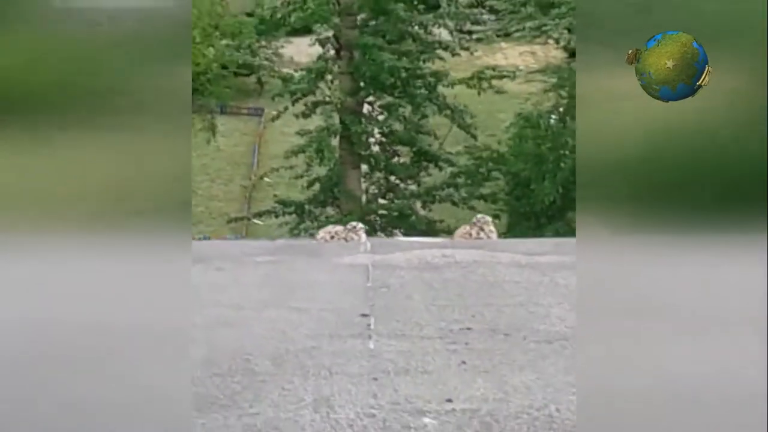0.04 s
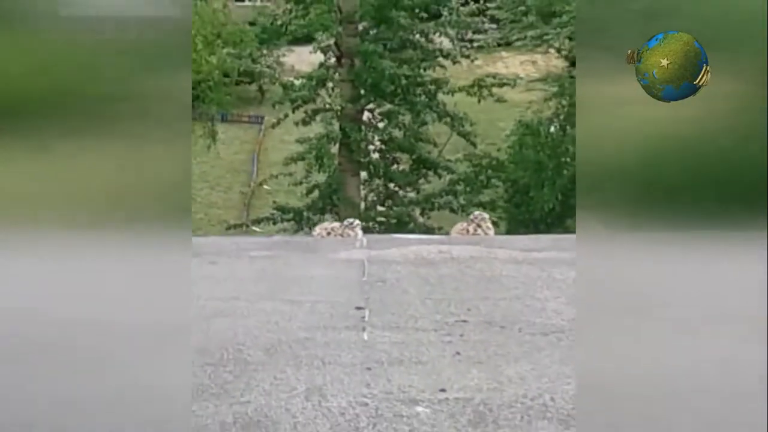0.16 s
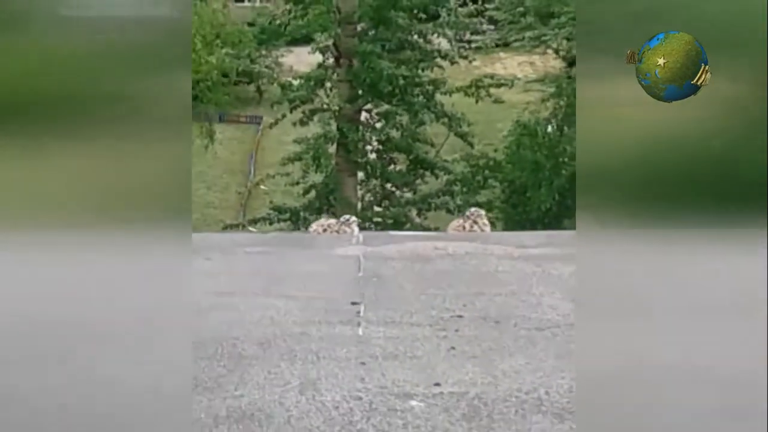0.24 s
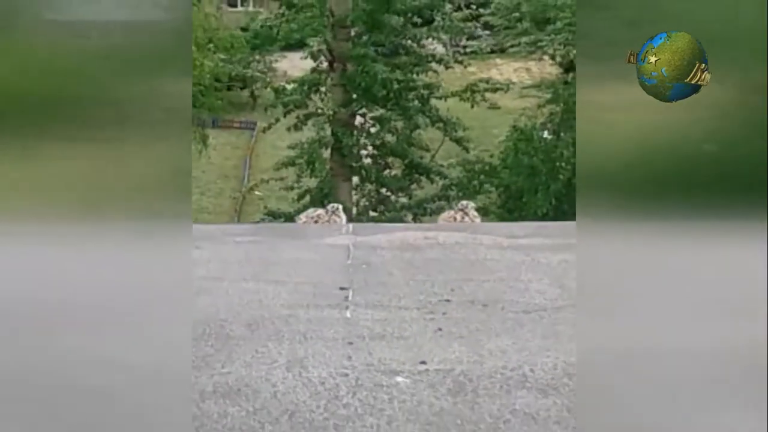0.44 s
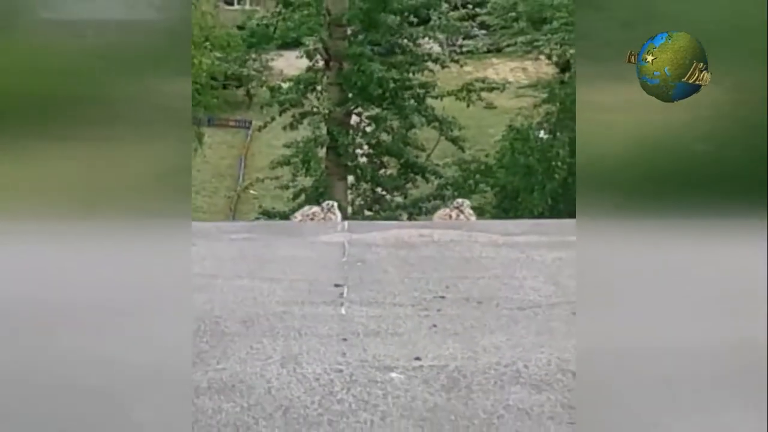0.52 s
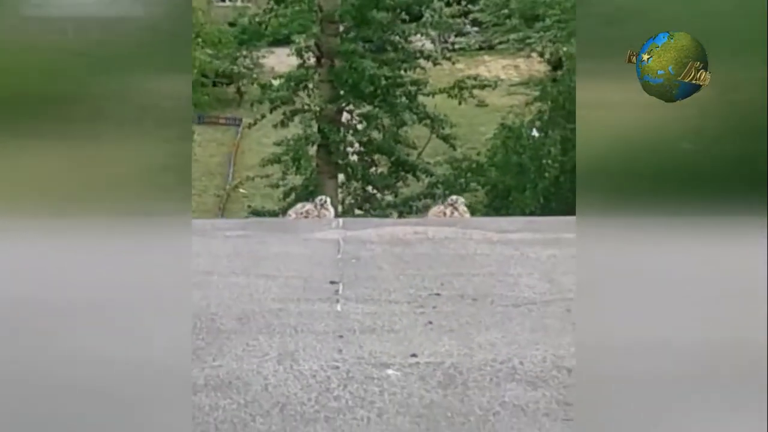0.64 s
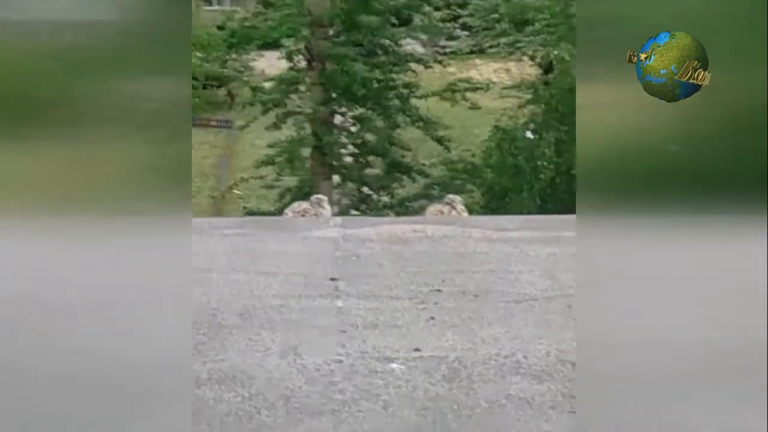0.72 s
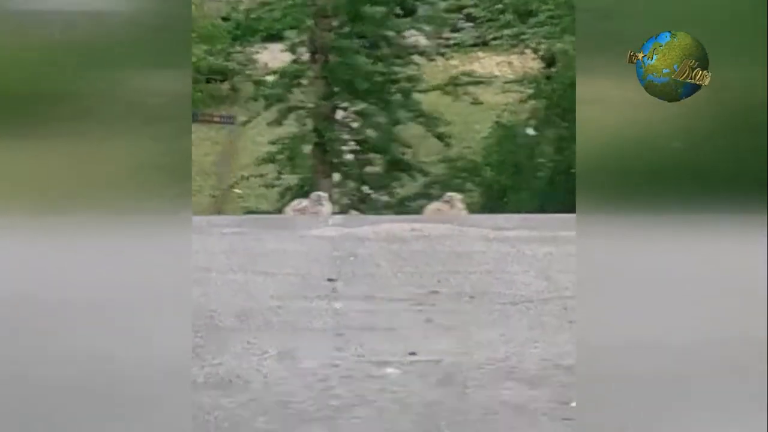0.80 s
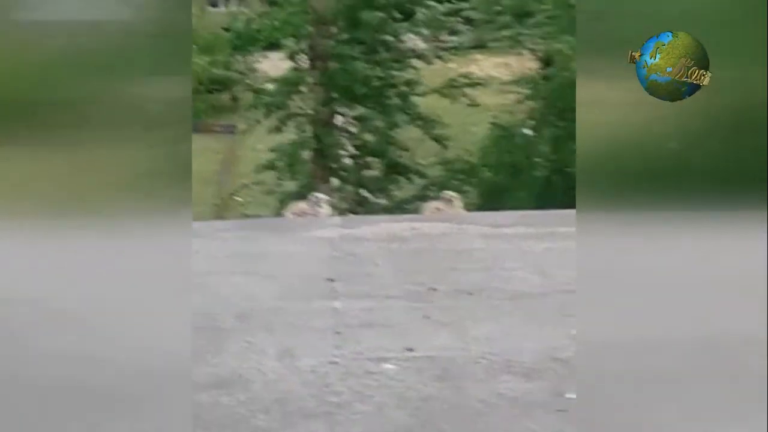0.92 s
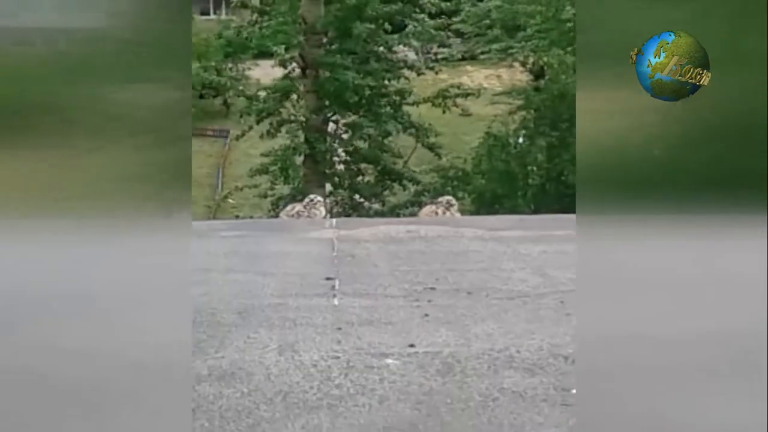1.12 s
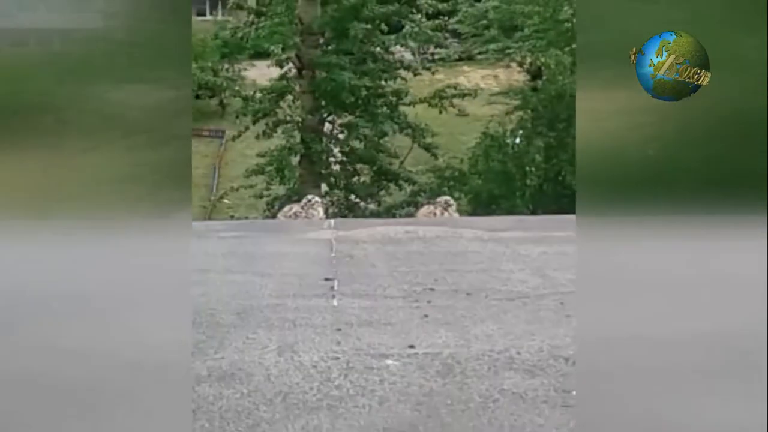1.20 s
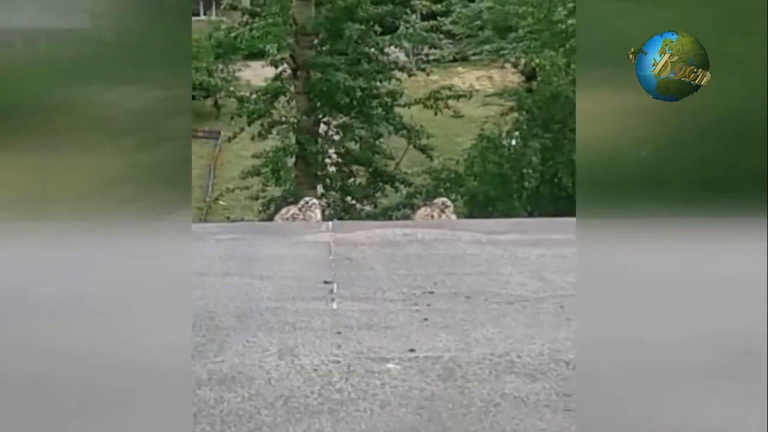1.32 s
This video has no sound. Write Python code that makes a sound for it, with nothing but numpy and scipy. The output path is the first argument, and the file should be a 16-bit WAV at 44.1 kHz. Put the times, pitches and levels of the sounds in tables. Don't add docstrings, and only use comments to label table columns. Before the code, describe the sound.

Two gulls cry on an outdoor rooftop. After low town rumble and a faint claw tick, the first croaks at 0.22 seconds, leaps to a shrill whistle and falls by 0.57. The second overlaps from 0.32, whistles from 0.41 to 0.57, then sags roughly until 0.75. Light echoes and faint distant gulls follow; claws tick from 0.95 and scuff near 1.12, under thin hiss until 1.35.

```python
import sys
import numpy as np
from scipy import signal
from scipy.io import wavfile

SR = 44100
rng = np.random.default_rng(int(sys.argv[2]) if len(sys.argv) > 2 else 0)


def unload_audio(sound):
    columns = np.transpose(np.atleast_2d(sound))
    steps = np.round(np.clip(columns, -1, 1) * 32767)
    wavfile.write(sys.argv[1], SR, steps.astype(np.int16))


def invert_db(x):
    u = np.asarray(x, float) / 20
    return 10 ** u


N = 59535

# (frequency [Hz], level [dB])
CROAK_THROAT = [(600, -20), (1300, -9), (1900, 0), (2700, -8), (3800, -6), (5500, -17), (10000, -34)]
CROAK_ROUGH, CHEST_ROUGH, WHISTLE_ROUGH = 0.55, 0.05, 0.14


def rms_one(x):
    return x / np.sqrt(np.mean(x ** 2) + 1e-20)


def in_time(rows):
    times, *columns = np.transpose(rows)
    return [np.interp(np.arange(N) / SR, times, column) for column in columns]


def at_hz(points, hz):
    table_hz, table_db = np.array(points).T
    return np.interp(np.log(hz), np.log(table_hz), table_db)


def drift(rate_hz, count):
    r = np.exp(-2 * np.pi * rate_hz / SR)
    settle = 4000
    noise = rng.standard_normal((count, N + settle))
    return rms_one(signal.lfilter([1], [1, -2 * r, r * r], noise)[:, settle:])


def gate(start, end, edge):
    t = np.arange(N) / SR
    return np.clip(np.minimum(t - start, end - t) / edge + 0.5, 0, 1)


def ring(x, hz, t60):
    r, w = invert_db(-60 / (t60 * SR)), 2 * np.pi * hz / SR
    return signal.lfilter([0, np.sin(w)], [1, -2 * r * np.cos(w), r * r], x + 1e-18)


def voice(rows, throat, rough, top_db, orders):
    pitch, *levels_db = in_time(rows)
    jitter = 1 + 0.0025 * drift(120, count=1)[0]
    phase = 2 * np.pi * np.cumsum(pitch * jitter) / SR

    effort_db = np.array([db - at_hz(throat, order * pitch) for order, db in zip(orders, levels_db)])
    k = np.arange(1, 17)
    share = np.array([np.interp(k, orders, one) for one in np.eye(len(orders))])
    if orders[-1] < 6:
        share[:, k > orders[-1]] = 1 / len(orders)

    unlisted = ~np.isin(k, orders)[:, None]
    waver_db = 4 * drift(30, count=16) * unlisted
    k = k[:, None]
    tilt_db = top_db * np.log2(np.maximum(k / orders[-1], 1))
    level_db = at_hz(throat, k * pitch) + share.T @ effort_db + waver_db + tilt_db

    grain = 1 + 0.35 * np.log2(k * pitch / 3900).clip(0) * drift(250, count=16)
    audible = k * pitch < 15800
    waves = np.sin(k * phase + rng.uniform(0, 2 * np.pi, k.shape))
    tone = np.sum(invert_db(level_db) * grain * audible * waves, axis=0)
    breath = 1 + rough * drift(600, count=1)[0]
    return np.sqrt(2) * gate(rows[0][0], rows[-1][0], 0.004) * breath * tone


def first_gull():
    # (time [s], pitch [Hz], level of each listed partial [dB], ..)
    croak = [(.217, 650, -49), (.224, 680, -39), (.231, 820, -42), (.239, 900, -38)]
    rise = [(0.239, 1297, -20, -26, -53), (0.249, 1364, -33, -20, -35.5), (0.261, 1477, -23, -35.5, -44.5),
            (0.268, 1483, -31, -23, -31)]
    whistle = [(0.267, 3325, -23.5, -38), (0.289, 3627, -18, -27.5), (0.307, 3658, -16, -41.5),
               (0.343, 3691, -17.5, -29), (0.361, 3689, -20.5, -35.5), (0.423, 3660, -34.5, -27),
               (0.431, 3580, -25.5, -39), (0.435, 3820, -34, -25.5), (0.455, 3140, -61, -68)]
    turn_down = [(.43, 2780, -54, -47), (.45, 2805, -50, -40), (.478, 2815, -44, -43)]
    fall = [(0.478, 1423, -58.5, -52, -55.5), (0.484, 1396, -34.5, -31.5, -35.5),
            (0.512, 1353, -35, -22, -36), (0.536, 1294, -32.5, -23.5, -21), (0.552, 1178, -45, -32, -58),
            (0.57, 945, -43, -35, -45)]
    # (frequency [Hz], level [dB])
    throat = [(700, -12), (1350, -16), (2700, -2.5), (4100, -6.5), (5500, -22.5), (7300, -19),
              (9500, -13.5), (14500, -26.5)]
    cry = voice(croak, CROAK_THROAT, CROAK_ROUGH, top_db=0, orders=[3])
    cry += voice(rise, throat, CHEST_ROUGH, top_db=-44, orders=[2, 3, 6])
    cry += voice(whistle, throat, WHISTLE_ROUGH, top_db=-6, orders=[1, 2])
    cry += voice(turn_down, throat, WHISTLE_ROUGH, top_db=-10, orders=[1, 2])
    cry += voice(fall, throat, CHEST_ROUGH, top_db=-4.5, orders=[1, 2, 3])
    return cry


def second_gull():
    # (time [s], pitch [Hz], level of each listed partial [dB], ..)
    croak = [(.324, 570, -38), (.332, 610, -24), (.338, 690, -27), (.346, 760, -26)]
    rise = [(0.345, 1101, -43, -15, -21, -36, -49), (0.352, 1149, -37, -17, -29, -22, -53.5),
            (0.362, 1202, -32, -16, -12, -37, -38), (0.372, 1254, -38.5, -15.5, -18, -34, -34.5),
            (0.379, 1261, -39.5, -13, -34, -37.5, -37), (0.39, 1294, -30.5, -15.5, -11.5, -39, -32.5),
            (0.402, 1394, -34.5, -27, -38, -23.5, -56), (0.411, 1450, -72, -13, -52, -24.5, -36.5)]
    whistle = [(0.41, 3093, -27.5, -48), (0.418, 3150, -11.5, -25), (0.432, 3249, -23, -31.5),
               (0.47, 3173, -14.5, -23), (0.498, 3280, -21.5, -32.5), (0.508, 3289, -14.5, -23.5),
               (0.532, 3334, -15.5, -27), (0.564, 3068, -15.5, -18), (0.577, 2730, -29, -64)]
    fall = [(0.571, 1249, -30, -13, -28, -47, -67), (0.581, 1265, -29, -8.5, -29, -42, -54),
            (0.593, 1243, -28, -11, -21.5, -52.5, -43), (0.611, 1207, -31, -17, -36.5, -36.5, -71),
            (0.629, 1200, -32.5, -30, -28, -31, -73), (0.651, 1164, -46.5, -17, -22.5, -33.5, -69),
            (0.667, 1135, -62, -14.5, -36, -37, -77.5), (0.688, 1047, -43, -27.5, -23.5, -42, -73)]
    rough_end = [(0.687, 1044, -34.5, -37, -35, -36), (0.707, 957, -28, -41.5, -30, -42),
                 (0.721, 933, -30.5, -44, -45, -47), (0.735, 818, -34.5, -49, -51, -48),
                 (0.748, 853, -36.5, -50, -53, -60)]
    # (frequency [Hz], level [dB])
    throat = [(700, -26), (1250, -21), (2450, -3.5), (3700, -13), (5000, -4), (6400, -9), (9000, -18),
              (14000, -38)]
    cry = voice(croak, CROAK_THROAT, CROAK_ROUGH, top_db=0, orders=[3])
    cry += voice(rise, throat, CHEST_ROUGH, top_db=-13, orders=[1, 2, 3, 4, 11])
    cry += voice(whistle, throat, WHISTLE_ROUGH, top_db=-10, orders=[1, 2])
    cry += voice(fall, throat, CHEST_ROUGH, top_db=-17, orders=[1, 2, 4, 6, 11])
    cry += voice(rough_end, throat, 3 * CHEST_ROUGH, top_db=-14, orders=[2, 3, 4, 5])
    return cry


def claws():
    # (time [s], peak level [dB], pitch [Hz], ring time [s])
    ticks = [
        (.159, -35, 1900, .007),
        (.955, -36, 1700, .007),
        (.97, -37, 1600, .007),
        (.995, -41, 4000, .012),
        (1.0853, -33, 2200, .006),
        (1.1202, -26, 1900, .0025),
        (1.1202, -30, 3600, .001),
        (1.1268, -33, 1500, .003),
        (1.1295, -34, 2300, .004),
        (1.1345, -38, 2000, .004),
    ]
    grit = (rng.random(N) < 5000 / SR) * rng.standard_normal(N)
    scuff = rms_one(ring(grit, 1900, 0.0006) + 0.55 * grit)
    start, length = 1.112, 0.026
    out = invert_db(-47) * gate(start, start + length, 0.006) * scuff
    for time, db, hz, t60 in ticks:
        click = invert_db(db) * (np.arange(N) == int(time * SR))
        out += ring(click, hz, t60)
    return out


def walls(x):
    t = np.arange(SR) / SR
    near_fade = invert_db(-60 * t / 0.34)
    street_fade = invert_db(-14.5 - 60 * t / 1.22)
    shape = (near_fade + street_fade) * np.clip(t / 0.005, 0, 1)
    dull = signal.butter(1, 18000, fs=SR, output="sos")
    tail = signal.sosfilt(dull, rng.standard_normal((2, SR)) * shape)
    tail = tail / np.sqrt(np.sum(tail[0] ** 2))
    mid, side = signal.fftconvolve(x[None], tail)[:, :N]
    ears = np.array([[1], [-1]])
    return invert_db(-16.5) * (mid + invert_db(-22) * side * ears)


def far_gulls():
    # (start [s], end [s], pitch at start [Hz], pitch at end [Hz], level [dB])
    notes = [
        (.49, .74, 1810, 1850, -46),
        (.75, .89, 1860, 1900, -50),
        (.8, .95, 2430, 2510, -53),
        (.94, 1.06, 2510, 2400, -48),
        (.89, .96, 3330, 3330, -58),
        (0.01, .06, 2380, 2330, -52),
        (1.12, 1.35, 2520, 2480, -60),
    ]
    blur = 0.6
    out = np.zeros(N)
    for start, end, start_hz, end_hz, db in notes:
        pitch = in_time([(start, start_hz), (end, end_hz)])[0]
        phase = 2 * np.pi * np.cumsum(pitch) / SR
        u, v = drift(110, count=2)
        note = (1 + blur * u) * np.sin(phase) + blur * v * np.cos(phase)
        out += invert_db(db) * gate(start, end, 0.025) * note
    return out


def town():
    # (time [s], level [dB])
    loudness = [(0.0, -47.5), (0.22, -48), (0.526, -51.5), (1.35, -55.5)]
    # (frequency [Hz], level [dB])
    colour = [(29, -70.5), (50, -8.5), (136, -1), (352, -4.5), (429, -30), (480, -7), (586, -7.5),
              (2070, -14), (10000, -23), (13000, -55), (22000, -120)]
    # (time [s], level [dB])
    hiss_level = [(.42, -3), (.46, -22), (.62, -22), (.66, -29), (.76, -11), (.94, -13), (.97, 0),
                  (1.0, -2.5), (1.35, -9.5)]
    hum = 0
    edges = 25 * 2 ** np.arange(0, 9, 0.5)
    white, flicker = rng.standard_normal((2, 2, N)), drift(6.5, count=17)
    for k, (low, high) in enumerate(zip(edges, edges[1:])):
        band_pass = signal.butter(2, [low, high], "band", fs=SR, output="sos")
        band = signal.sosfilt(band_pass, white[k % 2])
        band_db = at_hz(colour, np.sqrt(low * high)) + 1.2 * flicker[k]
        hum = hum + invert_db(band_db) * band
    mid, side = rms_one(hum)

    treble = signal.butter(4, 11700, "high", fs=SR, output="sos")
    air = rms_one(signal.sosfilt(treble, white[0]))
    air = invert_db(-5 + in_time(hiss_level)[0] + 3.5 * drift(40, count=1)) * air
    ears = np.array([[1], [-1]])
    both = mid + air[0] + ears * (invert_db(-36) * side + invert_db(-22) * air[1])
    return invert_db(in_time(loudness)[0] + 7) * both


def scene():
    near = first_gull() + second_gull() + claws()
    return near + walls(near) + far_gulls() + town()


def band_limit(x):
    return signal.sosfilt(signal.butter(12, 15830, fs=SR, output="sos"), x)


def record(dry):
    # (time [s], level [dB])
    lean = [(.19, 0), (.21, -1.25), (.71, -1.25), (.74, 0)]
    soft_top = 0.75
    limited = soft_top * np.tanh(dry / soft_top)
    mix = signal.sosfilt(signal.butter(2, 45, "high", fs=SR, output="sos"), limited)
    dip_hz, dip_width_hz = 11400, 2600
    b, a = signal.iirpeak(dip_hz, dip_hz / dip_width_hz, fs=SR)
    for _ in range(3):
        mix = mix - 0.68 * signal.lfilter(b, a, mix)
    mix = mix * invert_db(in_time(lean)[0] * np.array([[0.5], [-0.5]]))
    return band_limit(mix)


dry = scene()
out = record(dry)
unload_audio(out)
```